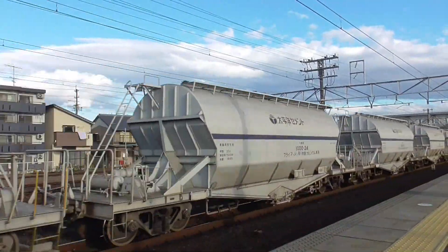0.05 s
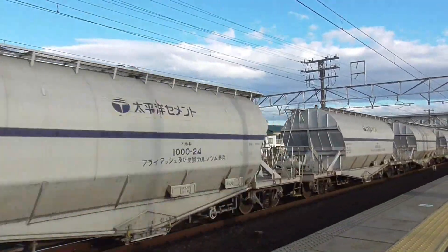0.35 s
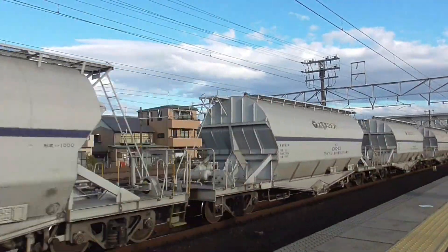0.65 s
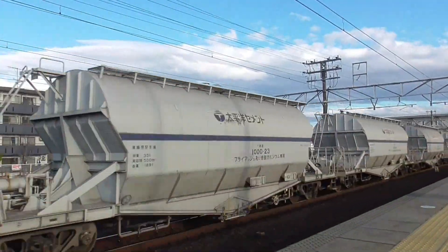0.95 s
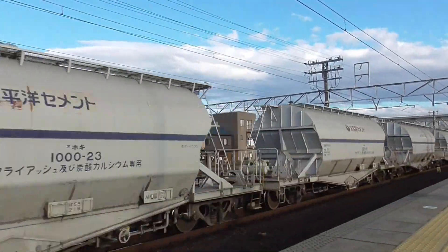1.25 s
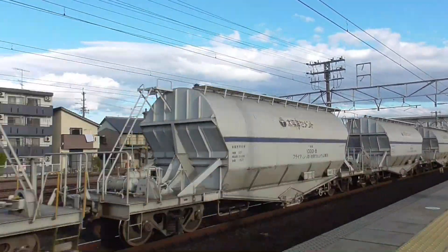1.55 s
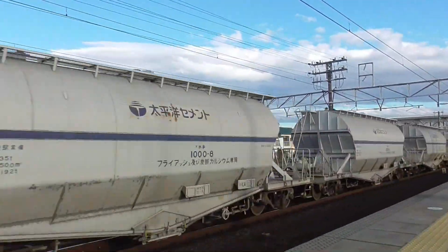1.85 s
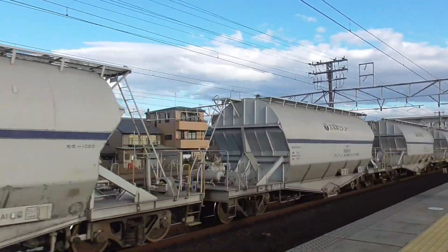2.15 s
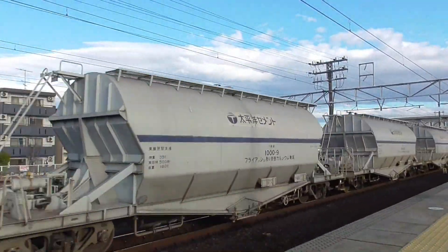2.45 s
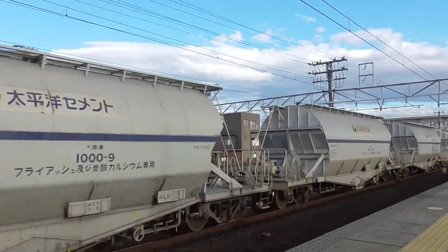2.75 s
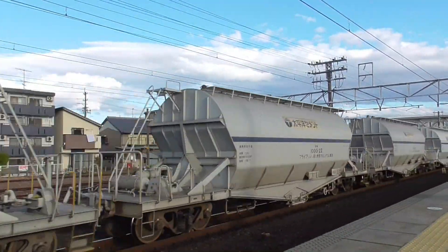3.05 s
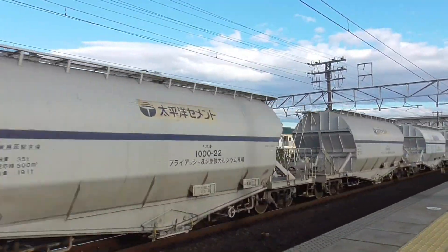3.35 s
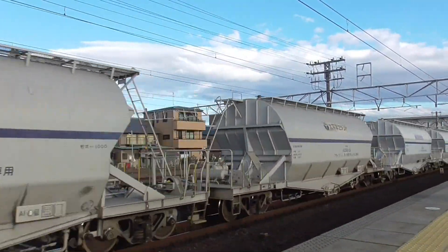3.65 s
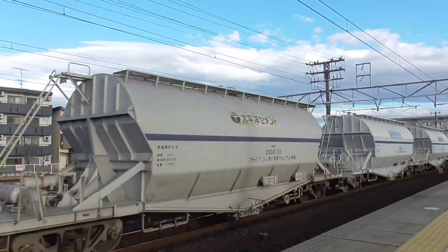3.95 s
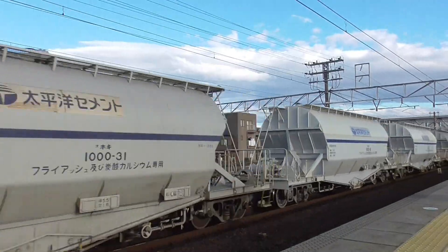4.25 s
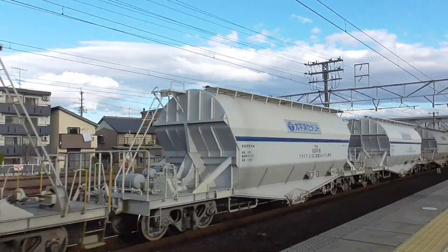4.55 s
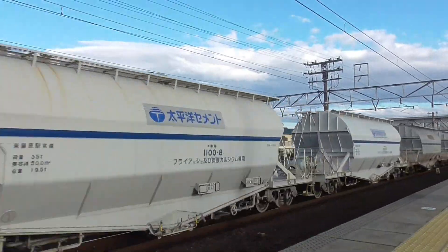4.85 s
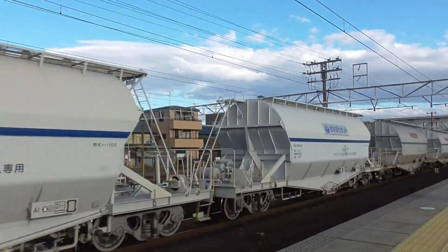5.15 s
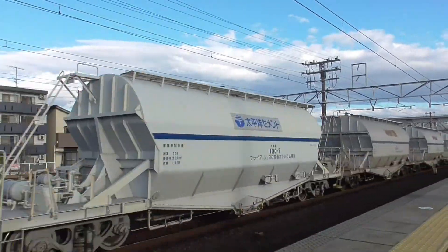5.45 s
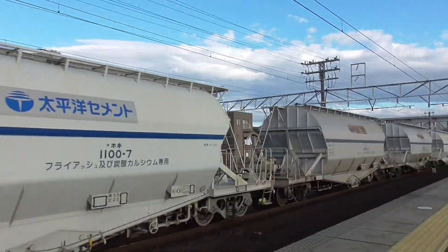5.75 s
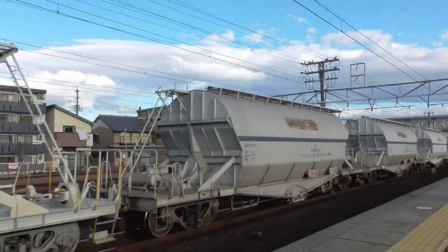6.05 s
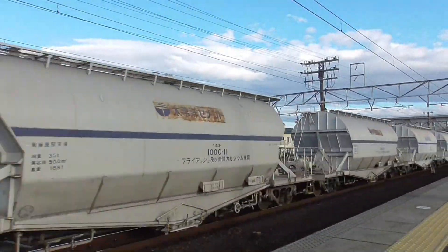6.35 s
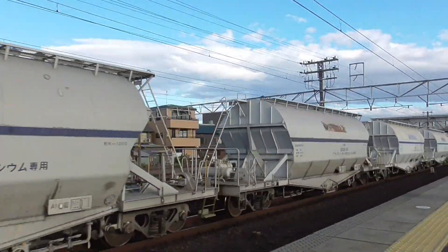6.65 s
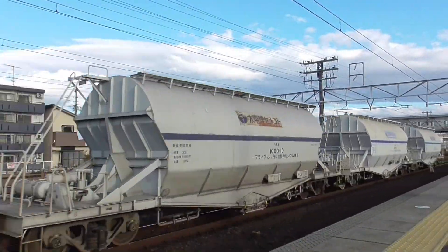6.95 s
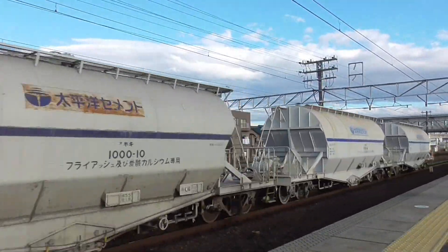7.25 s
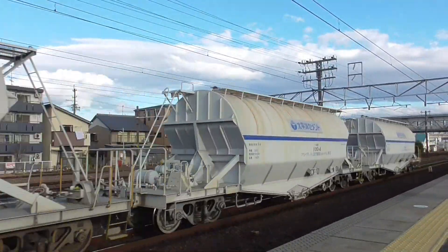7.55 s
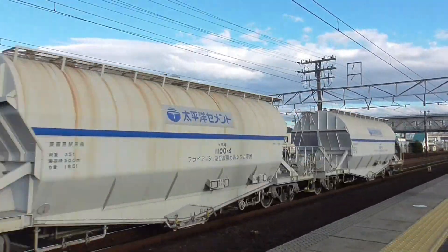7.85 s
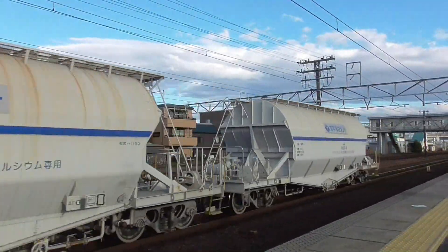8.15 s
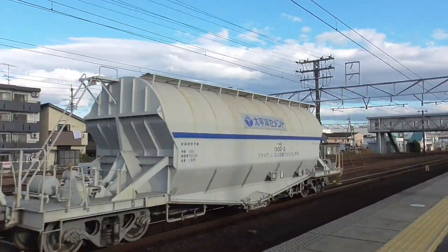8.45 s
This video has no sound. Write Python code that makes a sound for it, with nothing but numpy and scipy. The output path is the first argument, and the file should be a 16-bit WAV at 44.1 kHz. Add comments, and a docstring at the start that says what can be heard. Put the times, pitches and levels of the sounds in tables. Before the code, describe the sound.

Heard in stereo from a station platform, freight wagons pass close by with a continuous rumble, rattle and hiss that comes from ahead and moves to the left. Two quick pairs of ringing, thudding wheel clacks repeat about every three quarters of a second. Thin, faint metallic squeals come and go, gathering later on, and three short chattering scrapes sound just before the end while the train keeps rolling.

```python
"""A freight train rumbles, roars and hisses past a station platform, a few metres from two microphones.
At every coupling between its tank wagons, four axles drop over one rail joint: the track thuds, the
hollow wagon booms, the bogie (the frame that holds two axles) clangs and the wheel rings on, sinking in
pitch. The rolling noise swells as each bogie comes from ahead and draws level on the left. The flanges
(the wheels' guiding rims) rasp and squeal faintly, and near the end loose gear scrapes."""
import sys
import numpy as np
from scipy import signal
from scipy.fft import rfft, irfft, next_fast_len
from scipy.io import wavfile
from scipy.ndimage import uniform_filter1d, minimum_filter1d

SR = 44100
rng = np.random.default_rng(int(sys.argv[2]) if len(sys.argv) > 2 else 0)


def wav_out(sig):
    """Save sig, one row per channel (or a flat mono array), as 16-bit PCM at SR to the path in sys.argv[1]."""
    wavfile.write(sys.argv[1], SR, np.round(np.clip(np.atleast_2d(sig).T, -1, 1) * 32767).astype(np.int16))


N = 380141

# Couplings going by, with a bogie on either side. Each row: second when the first axle hits the joint,
# then how many dB louder the knock, wheel ring, rumble, tread roughness and flange grind are.
COUPLINGS = [(0.1718, 1, -2.5, -3, 0, 3), (0.9287, 0, -0.5, -0.5, 0, 1), (1.6846, -.5, -0.5, -2, -2.5, 1),
             (2.4421, 0.5, -1, -2, -3, 0), (3.1998, -0.5, 1, -2, -1, 2.5), (3.959, -0.5, -0.5, -1, 0, 3),
             (4.7169, .5, -2.5, -2, 0.5, 0), (5.4748, 0, -3, -1, -0.5, -3), (6.2353, 0, -2, 0, 1, 8),
             (6.9953, 0, -0.5, 1, 2, 2), (7.7545, 0, -3.5, -3, 1, 3), (8.517, 0, -18, 4, 2.5, -12)]
SHAKE, TREAD, FLANGE = range(3, 6)  # its last three columns
# The four axles at a coupling. Each row: seconds after the first; relative levels in dB of thud, boom,
# clang, crack and ring; the boom's pitch in Hz, swell and fade in seconds; clang pitch in Hz;
# the thud's echo delay in seconds and echo level in dB.
AXLES = [(0, -15.5, -18, -22.5, -22.5, -33, 276.4, 0.0066, 0.094, 876, .0185, -11),
         (0.0876, -18, -19, -22, -26, -33.5, 296, 0.03, .2, 1010, 0.022, -10.5),
         (.22, -18, -21, -27, -24, -32.5, 281, 0.011, 0.21, 806, 0.011, -4),
         (.3069, -18, -27.5, -23.5, -26.5, -31.5, 270.3, .025, 0.27, 1080, 0.032, -7.5)]
# A steel wheel's own tones. Each row: pitch in Hz, relative level in dB, seconds to fade by 60 dB.
WHEEL_TONES = [(2003, 2, 0.16), (2462, -3.5, 0.33), (2743, -4, 0.55), (3160, 0, 0.22), (3446, -5, 0.56),
               (3820, -6, 0.37), (4350, -9, 0.8), (4730, -11, 0.82), (5210, -10, 0.53), (5810, -10.5, 0.61),
               (6470, -6, 0.52), (7300, -12, 0.25), (7610, -3.5, 0.41), (8780, -4.5, 0.32),
               (10000, -11, 0.38)]
# The dull knock of shaken stones or loose parts. Each row: frequency in Hz, relative level in dB.
KNOCK_SPECTRUM = [(50, -50), (85, -30), (140, 1), (280, -4), (500, 1.5), (750, -0.5), (1000, -9.5),
                  (1300, -12), (1750, -24), (3000, -50), (12000, -75)]
# How alike the two microphones hear a sound beside them, and one far ahead.
# Each row: frequency in Hz, likeness from 0 to 1.
NEAR_LIKENESS = [(30, .55), (70, .97), (290, .97), (640, .96), (1400, .94), (3100, .86), (7000, .8),
                 (15000, .5)]
FAR_LIKENESS = [(30, .5), (70, .97), (290, .94), (640, .84), (1400, .72), (3100, .58), (7000, .36),
                (15000, .1)]


def undb(db):
    """Turn decibels into a factor to multiply by."""
    return 10 ** (np.asarray(db) / 20)


def unit(x, span_s=None):
    """Scale to an average (rms) level of 1, over the first span_s seconds if given."""
    head = x if span_s is None else x[..., :max(int(span_s * SR), 8)]
    return x / np.sqrt(np.mean(head ** 2) + 1e-18)


def at_hz(points, hz):
    """Read between the rows of a (Hz, value) table, giving every octave the same room."""
    row_hz, value = np.transpose(points)
    return np.interp(np.log(np.maximum(hz, 1)), np.log(row_hz), value)


def fade(t, t60):
    """Die away by 60 dB in t60 seconds."""
    return np.exp(-np.log(1000) * t / t60)


def wander(rate):
    """A random curve, roughly between -1 and 1, that turns about rate times a second."""
    knots = rng.standard_normal(4096)
    return 1.2 * np.interp(np.arange(N) / SR * rate, np.arange(len(knots)), knots)


def noise(spectrum, size, likeness=NEAR_LIKENESS):
    """Stereo noise with the given spectrum; left and right differ most in the treble."""
    n = next_fast_len(size)
    hz = np.fft.rfftfreq(n, 1 / SR)
    like = np.clip(at_hz(likeness, hz), 0, .995)
    white = rfft(rng.standard_normal((2, n)))
    mid, side = white * np.sqrt([1 + like, 1 - like]) * undb(at_hz(spectrum, hz))
    return unit(irfft(np.array([mid + side, mid - side]), n)[:, :size])


def swell(spectrum, length_s, likeness=NEAR_LIKENESS):
    """A burst of noise that rises and falls in one arch."""
    size = int(length_s * SR)
    return noise(spectrum, size, likeness) * np.sin(np.pi * np.arange(size) / size)


def ring(t, hz, gains, phase_spread):
    """Add up tones, one a row; each spreads its own way and reaches the two microphones out of step."""
    turn = phase_spread * rng.standard_normal(len(hz)) * np.array([[1], [-1]])
    phase = (2 * np.pi * hz * t).astype(np.float32)
    return np.cos(turn) @ (gains * np.sin(phase)) + np.sin(turn) @ (gains * np.cos(phase))


def add(out, x, start_s):
    """Mix x into out from start_s on."""
    start = int(round(start_s * SR))
    first, last = max(start, 0), min(start + x.shape[-1], N)
    if last > first:
        out[:, first:last] += x[..., first - start:last - start]


def nearness(t, approach_s, recede_s, lead_s):
    """Summed power of the axles: each swells until lead_s before it hits the joint, then fades."""
    strikes = np.add.outer([row[0] for row in COUPLINGS], [axle[0] for axle in AXLES]).reshape(-1, 1)
    since = t - strikes + lead_s
    return np.sum((1 + (since / np.where(since < 0, approach_s, recede_s)) ** 2) ** -2, axis=0)


def passing(column, far_db, approach_s, recede_s, lead_s):
    """Level in dB of the near axles plus the far train, raised or lowered by a column of COUPLINGS."""
    t = np.arange(0, N / SR, .002)
    columns = np.transpose(COUPLINGS)
    power = nearness(t, approach_s, recede_s, lead_s) + undb(far_db) ** 2
    level_db = 10 * np.log10(power) + np.interp(t, columns[0] - lead_s, columns[column])
    return np.interp(np.arange(N) / SR, t, level_db)


def on_the_left(x):
    """Sound from the track alongside reaches the left microphone earlier and louder."""
    # The shadow of the microphones' housing. Each row: frequency in Hz, left minus right in dB.
    shadow = [(200, 0), (700, 1.5), (1300, 2), (2400, 5), (4400, 8.5), (8100, 0), (15000, -1)]
    # The left side's head start. Each row: frequency in Hz, phase lead in radians.
    left_lead = [(0, 0), (1550, 1.14), (1810, 0.46), (2670, 1.23), (3190, 1.2), (3790, 1.3), (4390, 0.7),
                 (5170, 0.05), (5940, 1.4), (6200, 1), (8440, 2), (11500, 3.5), (13200, 5), (15600, 4)]
    size = next_fast_len(N + SR // 10)
    hz = np.fft.rfftfreq(size, 1 / SR)
    side = np.array([[.5], [-.5]])
    gain = undb(side * at_hz(shadow, hz))
    turn = np.exp(1j * side * np.interp(hz, *np.transpose(left_lead)))
    return irfft(rfft(x, size) * gain * turn, size)[:, :N]


def travelling(spectrum, ahead_db=-7, approach_s=0.055, recede_s=0.15):
    """Rolling noise comes from straight ahead until a bogie draws level, then from the left."""
    t = np.arange(0, N / SR, .002)
    near = nearness(t, approach_s, recede_s, 0)
    share = np.interp(np.arange(N) / SR, t, near / (near + undb(ahead_db) ** 2))
    beside = np.sqrt(share) * on_the_left(noise(spectrum, N))
    return beside + np.sqrt(1 - share) * noise(spectrum, N, FAR_LIKENESS)


def rolling(rumble_db=-33.5, roar_db=-28, rattle_db=-38.5, hiss_db=-37.5):
    """Rough treads (the wheels' running faces) shake wagons and track, and hiss where they touch."""
    # Deep, middle and high rolling noise. Each row: frequency in Hz, relative level in dB.
    rumble_spectrum = [(20, -26), (40, -37), (60, -18.5), (75, -14), (92, -1.5), (115, -8.5), (140, -2),
                       (190, -8), (260, -15.5), (500, -55)]
    roar_spectrum = [(130, -32), (200, -4), (245, 1.5), (300, -1), (350, -3.5), (450, -8.5), (730, -10),
                     (900, -16.5), (1300, -19), (1720, -27.5), (2020, -24.5), (2700, -32), (5000, -33),
                     (14000, -70)]
    hiss_spectrum = [(1200, -34), (2100, -19), (2800, -2), (3400, 1), (4700, -1), (5600, -3), (6700, -1),
                     (8400, 2), (9500, -5), (13500, -12), (16000, -23)]
    rumble = passing(SHAKE, far_db=1, approach_s=0.11, recede_s=.025, lead_s=0.09)
    roar = passing(TREAD, far_db=-1.5, approach_s=.16, recede_s=0.13, lead_s=0.0091)
    hiss = passing(TREAD, far_db=-7, approach_s=0.078, recede_s=0.091, lead_s=0.0017)
    bumps_db = wander(45)
    out = undb(rumble + rumble_db) * noise(rumble_spectrum, N)
    out += undb(roar + roar_db + bumps_db) * travelling(roar_spectrum)
    out += undb(rumble + rattle_db) * rattle()
    flicker_db = 1.55 * (bumps_db + wander(160)) / 2
    return out + undb(hiss + hiss_db + flicker_db) * travelling(hiss_spectrum)


def rattle(count=400, t60=0.092, range_db=4):
    """Loose couplings and brake gear knock at random."""
    out, t = np.zeros((2, N)), np.arange(SR // 10) / SR
    for place, force in rng.random((count, 2)):
        knock = noise(KNOCK_SPECTRUM, len(t)) * fade(t, t60)
        add(out, undb(range_db * force) * knock, place * N / SR)
    return unit(out)


def singing_wheels(level_db=-46, lead_s=.25, length_s=.55, width_hz=35, scatter=0.032, uneven_db=3):
    """Rolling keeps the wheels' own tones singing, a little differently on each bogie."""
    out = np.zeros((2, N))
    hz, db, _ = np.transpose(WHEEL_TONES)[:, :, None]
    tilt_db = -np.log2(hz / hz[0])  # 1 dB softer per octave
    grid_hz = np.geomspace(500, 16000, 2000)
    for start_s, *_ in COUPLINGS:
        for lag_s, *_ in AXLES[::2]:
            detune, strength = rng.standard_normal((2, len(hz), 1))
            peaks = undb(db + uneven_db * strength + tilt_db) ** 2
            off_peak = (grid_hz - hz * (1 + scatter * detune)) / width_hz
            power = np.sum(peaks / (1 + off_peak ** 2) ** 2, axis=0)
            tone = swell(np.column_stack([grid_hz, 10 * np.log10(power)]), length_s)
            add(out, undb(level_db) * tone, start_s + lag_s - lead_s)
    return out


def flanges(rasp_db=-46, grit_db=2.5, squeal_db=-3, waver_db=2.5, width=0.007, skirt=0.03):
    """Flanges rasp on the rail and slip in bursts; at times one wheel tone swells to a wavering squeal."""
    # Steel rubbing on steel. Each row: frequency in Hz, relative level in dB.
    rasp_spectrum = [(4000, -37), (6200, -2), (6800, -0.5), (7700, 2.5), (8800, -3.5), (9600, -2.5),
                     (11000, -5), (12500, -12), (15500, -42)]
    # Hard slips as a bogie comes up. Each row: start in seconds, length in seconds, level in dB.
    slips = [(3.548, 0.59, -42), (5.98, 0.29, -38), (6.881, 0.15, -38.5), (7.86, 0.12, -39.5)]
    # Wheel squeals. Each row: start in seconds, length in seconds, pitch in Hz, relative level in dB.
    squeals = [(1.562, .09, 4630, -40), (3.32, 0.13, 5270, -40), (3.6, 0.23, 11200, -52),
               (3.72, 0.28, 9020, -44), (6.08, 0.16, 10900, -54), (6.3, .36, 2780, -42.5),
               (6.46, 0.29, 4310, -38), (7.0, 0.48, 3340, -42), (7.037, 0.44, 4270, -42),
               (7.606, 0.13, 11200, -46), (7.904, 0.084, 8400, -40), (8.05, 0.24, 3240, -43)]
    grind = passing(FLANGE, far_db=-1.5, approach_s=0.077, recede_s=0.055, lead_s=0.018)
    rasp = undb(grind + rasp_db) * travelling(rasp_spectrum)
    for start_s, length_s, db in slips:
        add(rasp, undb(db) * swell(rasp_spectrum, length_s, FAR_LIKENESS), start_s)
    squealing = np.zeros((2, N))
    for start_s, length_s, hz, db in squeals:
        narrow_peak = [(hz / 2, -80), (hz * (1 - skirt), -17), (hz * (1 - width), -10), (hz, 0),
                       (hz * (1 + width), -10), (hz * (1 + skirt), -17), (hz * 1.5, -80)]
        add(squealing, undb(db + squeal_db) * swell(narrow_peak, length_s, FAR_LIKENESS), start_s)
    grit = undb(grit_db * (wander(35) + wander(300)) / 2)
    return rasp * grit + squealing * undb(waver_db * wander(40))


def rail_joint(wear_spread=.015, lowest_hz=100):
    """Every axle strikes the joint; the two axles of a bogie are worn alike."""
    out, t = np.zeros((2, N)), np.arange(SR * 2 // 5) / SR
    for start_s, knock_db, wheel_db, *_ in COUPLINGS:
        wear = wear_spread * rng.standard_normal(2)
        for k, (lag_s, thud_db, boom_db, clang_db, crack_db, ring_db,
                boom_hz, swell_s, boom_t60, clang_hz, echo_s, echo_db) in enumerate(AXLES):
            blow = undb(thud_db + 0.45) * track_thud(t, echo_s, echo_db)
            blow += undb(boom_db - 5) * wagon_boom(t, boom_hz, swell_s, boom_t60)
            blow += undb(clang_db - 1) * bogie_clang(t, clang_hz)
            blow += undb(crack_db) * steel_crack(t)
            blow += undb(-21) * sleeper_thump(t)
            ringing = undb(ring_db + wheel_db + 0.1) * wheel_ring(t, wear[k // 2])
            add(out, undb(knock_db) * blow + ringing, start_s + lag_s)
    # the blows are kept clear of deep bass
    return signal.sosfilt(signal.butter(2, lowest_hz, "high", fs=SR, output="sos"), out)


def track_thud(t, echo_s, echo_db, scatter=0.034, uneven_db=2, drop_s=0.001, stones_db=-9):
    """The wheel drops on the rail end: the track rings briefly, echoes under the wagon, shakes stones."""
    # Rail and sleepers on their bed of stones.
    # Each row: pitch in Hz, relative level in dB, seconds to fade by 60 dB.
    track_tones = [(160, -11.5, 0.036), (198, -5.5, 0.03), (408, 1.5, 0.041), (481, 8, 0.027),
                   (556, -6.5, 0.063), (657, -5.5, 0.11), (733, -8, 0.12)]
    hz, db, t60 = np.transpose(track_tones)[:, :, None]
    detune, strength = rng.standard_normal((2, len(track_tones), 1))
    late = np.maximum(t - drop_s, 0)  # the full load lands a moment after the first touch
    gains = undb(db + uneven_db * strength) * fade(late, t60) * (1 - np.exp(-late / 0.0014))
    body = ring(late, hz * (1 + scatter * detune), gains, phase_spread=.22)
    echo = np.array([np.interp(t - echo_s, t, channel, left=0) for channel in body])
    stones = noise(KNOCK_SPECTRUM, len(t)) * fade(t, t60=.33) * (1 - np.exp(-t / 0.00092))
    return unit(body + undb(echo_db) * echo, span_s=.015) + undb(stones_db) * unit(stones, span_s=.015)


def wagon_boom(t, hz, swell_s, t60, delay_s=0.00459, scatter=0.0352, upper_ratio=1.14, upper_db=-5):
    """The blow climbs through the springs; the hollow wagon booms on two close tones that throb."""
    late = np.maximum(t - delay_s, 0)
    pair_hz = hz * np.array([[1], [upper_ratio]]) * (1 + scatter * rng.standard_normal((2, 1)))
    gains = undb([[0], [upper_db]]) * (1 - np.exp(-late / swell_s)) * fade(late, t60)
    return unit(ring(late, pair_hz, gains, phase_spread=.13), span_s=.06)


def bogie_clang(t, hz, rise_s=0.00048, t60=0.15, width=1.3):
    """The bogie frame answers with a short, noisy ring around one pitch."""
    cluster = [(hz / 2, -25), (hz / width, -7), (hz, 0), (hz * width, -6), (hz * 2, -30), (hz * 10, -75)]
    return unit(noise(cluster, len(t)) * (1 - np.exp(-t / rise_s)) * fade(t, t60), span_s=0.0087)


def steel_crack(t, rise_s=0.00075, t60=0.02, tail_db=-10, tail_t60=0.25):
    """Steel meets steel with a crack, and the rail carries its tail away."""
    # The bright noise of the hit. Each row: frequency in Hz, relative level in dB.
    crack_spectrum = [(700, -4), (1300, 8.5), (1750, -9), (2100, 5.5), (3200, -0.5), (5000, -4.5),
                      (8000, -5.5), (10000, -7), (13000, -20), (16000, -22)]
    envelope = (1 - np.exp(-t / rise_s)) * (fade(t, t60) + undb(tail_db) * fade(t, tail_t60))
    return unit(noise(crack_spectrum, len(t)) * envelope, span_s=0.0083)


def sleeper_thump(t, hz=165, peak_s=.016, width_s=0.0074, scatter=0.11):
    """The sleeper (the beam under the rails) sinks and springs back: a few low swings."""
    pitch_hz = hz * (1 + scatter * rng.standard_normal())
    return np.sin(2 * np.pi * pitch_hz * t) * np.exp(-((t - peak_s) / width_s) ** 2)


def wheel_ring(t, wear, scatter=.02, uneven_db=3, sink_per_s=.11, copies=3):
    """Close wheel tones throb, fade and sink in pitch as the wheel goes by; a worn wheel rings lower."""
    hz, db, t60 = np.repeat(WHEEL_TONES, copies, axis=0).T[:, :, None]
    detune, strength, side = rng.standard_normal((3, len(hz), 1))
    gains = np.sign(side) * undb(db + uneven_db * strength) * fade(t, t60)
    slowing_t = t - sink_per_s * t ** 2 / 2  # the Doppler effect
    tones = ring(slowing_t, hz * (1 - wear + scatter * detune), gains, phase_spread=0.62)
    return unit(tones, span_s=0.078)


def scrapes(grit_db=3):
    """Loose running gear chatters against the frame for a moment."""
    # The scrapes. Each row: start in seconds, length in seconds, level in dB.
    bursts = [(7.897, 0.1, -24.5), (8.073, 0.11, -29.5), (8.318, 0.13, -27)]
    # Their chatter. Each row: frequency in Hz, relative level in dB.
    chatter_spectrum = [(250, -1), (600, 4), (1300, 4), (1750, -6), (2800, -10.5), (5000, -13.5),
                        (12000, -18), (16000, -40)]
    out, grit = np.zeros((2, N)), undb(grit_db * wander(220))
    for start_s, length_s, db in bursts:
        add(out, undb(db) * swell(chatter_spectrum, length_s), start_s)
    return out * grit


def limit(x, ceiling=0.76, hold_s=0.00066):
    """A fast limiter turns down the few peaks that pass the ceiling."""
    size = int(hold_s * SR)
    gain = ceiling / np.maximum(np.abs(x).max(0), ceiling)
    return x * uniform_filter1d(minimum_filter1d(gain, size), size)


def scene():
    """The joint, singing wheels and scrapes sound from the left; rolling and flanges travel past."""
    return on_the_left(rail_joint() + singing_wheels() + scrapes()) + rolling() + flanges()


def record(dry, low_hz=45.8, top_hz=15600):
    """Each microphone colours the sound; deep bass is cut, peaks are limited, the top treble is cut."""
    # The microphones' own colours. Each row: frequency in Hz, left minus right in dB.
    mic_balance = [(60, -0.5), (700, 0), (2400, 0.5), (4400, -2), (8100, -.5), (15000, -6)]
    size = next_fast_len(N + SR // 10)
    gains = undb(np.array([[.5], [-.5]]) * at_hz(mic_balance, np.fft.rfftfreq(size, 1 / SR)))
    heard = irfft(rfft(dry, size) * gains, size)[:, :N]
    heard = signal.sosfilt(signal.butter(2, low_hz, "high", fs=SR, output="sos"), heard)
    return signal.sosfilt(signal.ellip(10, .2, 80, top_hz, fs=SR, output="sos"), limit(heard))


dry = scene()
out = record(dry)
wav_out(out)
```